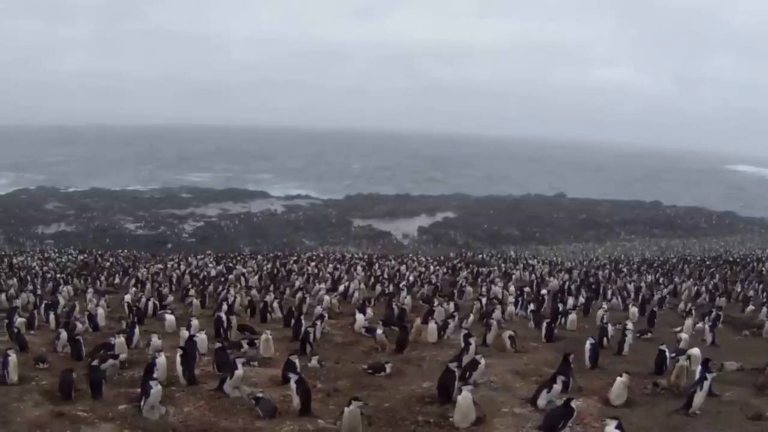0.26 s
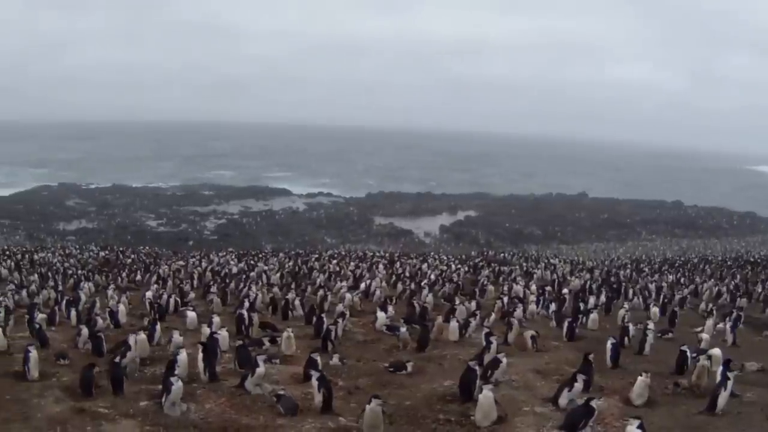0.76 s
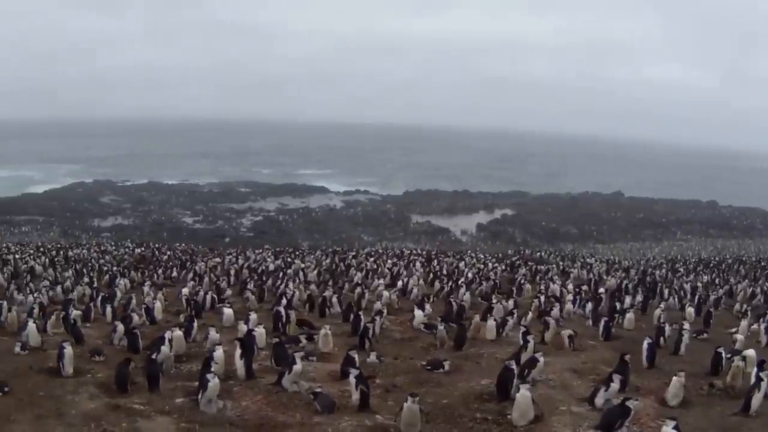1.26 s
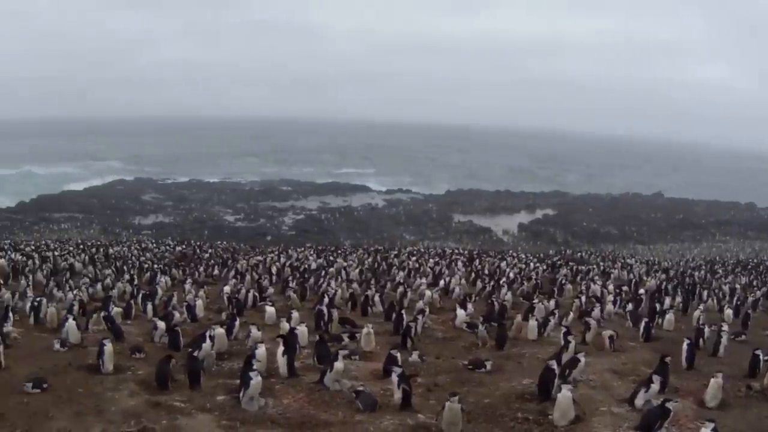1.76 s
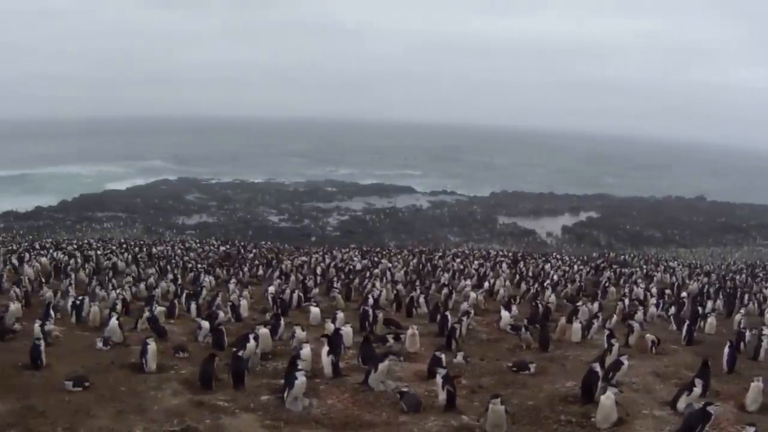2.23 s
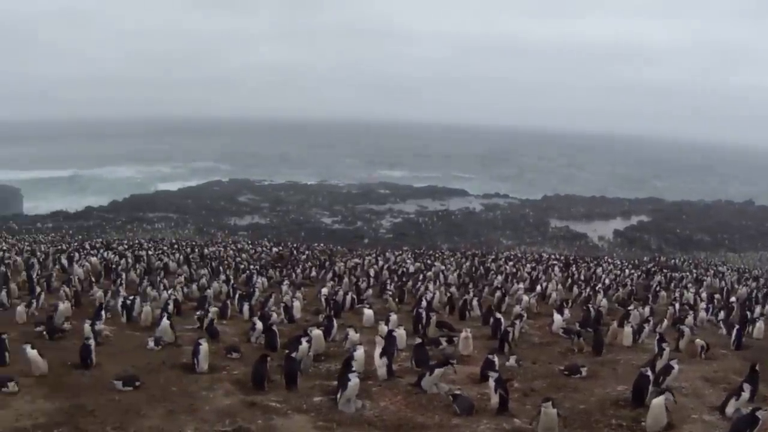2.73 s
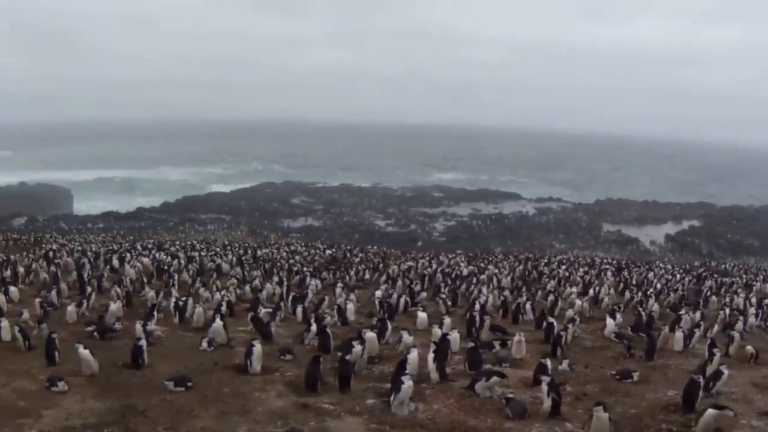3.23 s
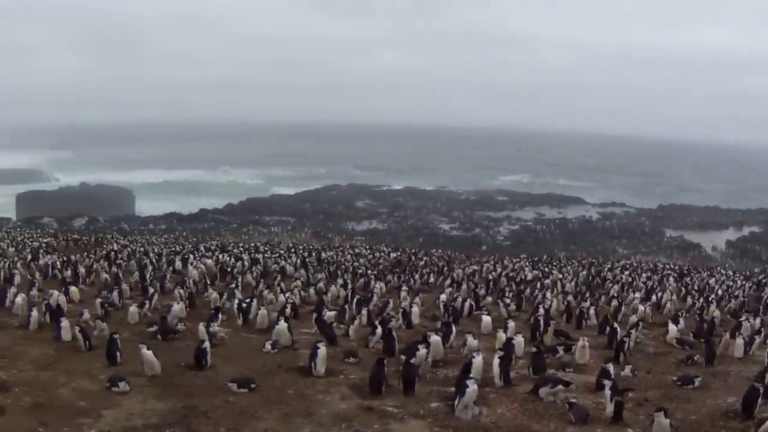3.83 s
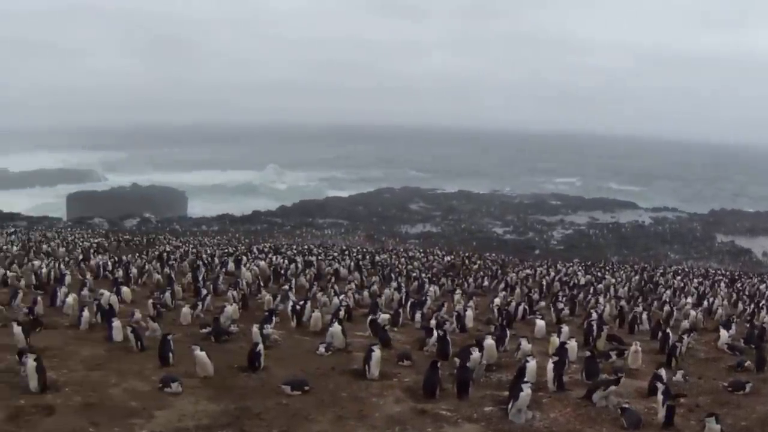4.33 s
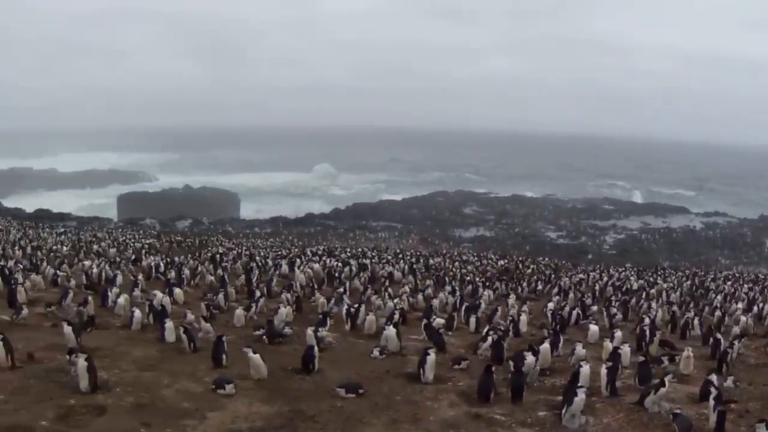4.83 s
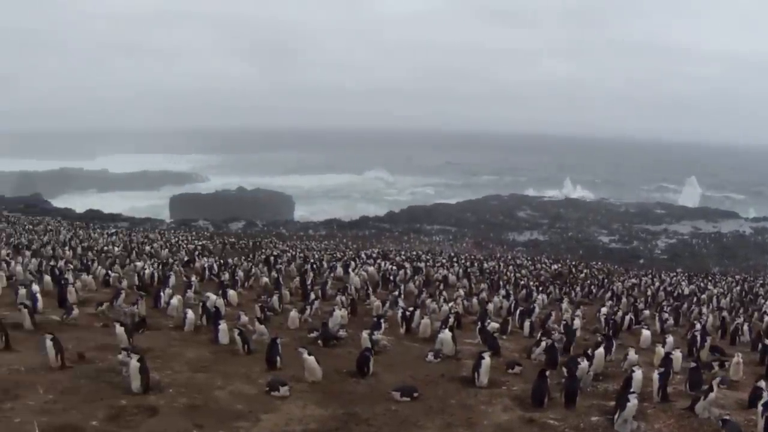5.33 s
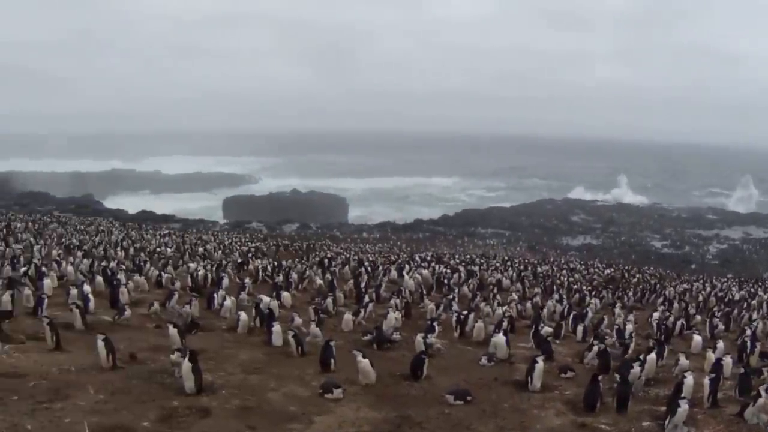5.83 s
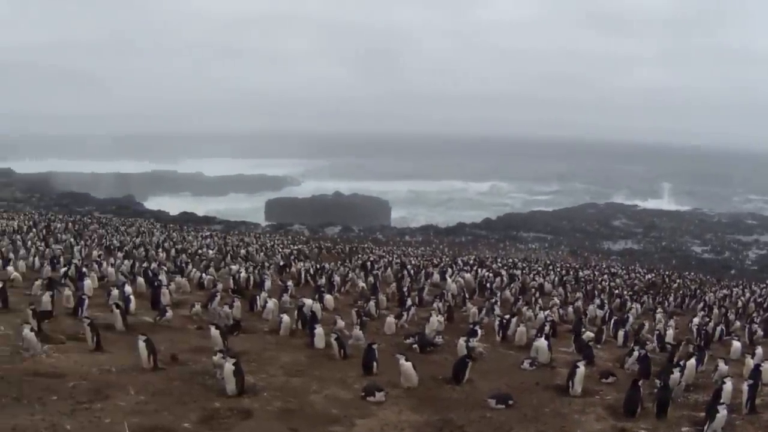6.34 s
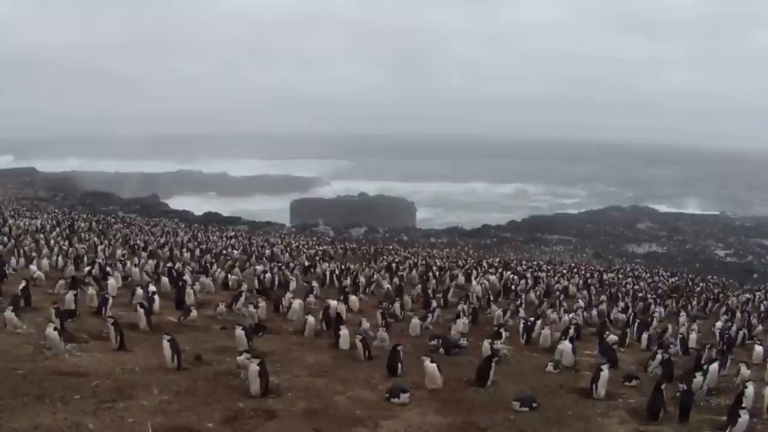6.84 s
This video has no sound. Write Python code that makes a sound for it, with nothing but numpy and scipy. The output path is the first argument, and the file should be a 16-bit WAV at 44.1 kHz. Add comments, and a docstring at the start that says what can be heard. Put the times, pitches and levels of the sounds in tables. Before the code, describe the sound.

Sharp chick peeps crowd the first four seconds, then short raspy adult penguin brays stand out above a dense distant colony and soft surf.

```python
"""Penguin colony on a windy shore.

Near chicks whistle arched peeps: bent sine glides with weak overtones. Adults bray: uneven voice pulses and
breath pass through throat resonances. Hundreds of far pulse-train calls blend over noise-band surf. A plastic
case around the small camera that hears them colours the sound; wind rumbles on it, a few soft low bumps sound
early on, and the recorder adds grit that follows the loudness."""
import sys
import numpy as np
from scipy import signal
from scipy.fft import rfft, irfft
from scipy.io import wavfile
from scipy.ndimage import uniform_filter1d

SR = 44100
rng = np.random.default_rng(int(sys.argv[2]) if len(sys.argv) > 2 else 0)


def store_pcm(level_fs):
    """Save levels as 16-bit WAV."""
    pcm = np.round(np.clip(level_fs, -1, 1) * 32767).astype(np.int16)
    wavfile.write(sys.argv[1], SR, np.atleast_2d(pcm).T)


N = 312730

# resonances of the plastic case, heard on brays and colony: (frequency [Hz], relative gain [dB])
CASE_RESONANCES = [(150, -77), (250, -40), (364, -54), (615, -30.5), (830, -16.5), (978, -3), (1490, -5),
                   (1650, -3), (2230, -16), (2520, -26), (2840, -29.5), (3350, -29.5), (3890, -35.5),
                   (5330, -18.5), (9000, -53), (11700, -71), (19800, -120)]
PEEP_ATTACK_S = 0.004


def undb(db):
    """Amplitude is the exponential of level: 20 dB is a factor of ten."""
    return 10 ** (np.asarray(db) / 20)


def level(x, db):
    """Normalises the root-mean-square amplitude to a level in dB."""
    return x * undb(db) / np.sqrt(np.mean(x ** 2))


def colour(x, table):
    """Spectral filtering: gain follows (Hz, dB) points, interpolated over log frequency."""
    hz, db = np.transpose(table)
    bins = np.maximum(np.arange(len(x) // 2 + 1) * SR / len(x), 1)
    gain_db = np.interp(np.log(bins), np.log(hz), db)
    return irfft(rfft(x) * undb(gain_db), len(x))


def ring(x, hz, width_hz):
    """Two-pole resonance with gain 1 at its centre."""
    return signal.lfilter(*signal.iirpeak(hz, hz / width_hz, fs=SR), x)


def walk(rate):
    """Slow random modulation: values held 1 / rate s, smoothed twice, rms 1."""
    k = int(SR / rate)
    held = np.repeat(rng.standard_normal(N // k + 1), k)
    smooth = uniform_filter1d(uniform_filter1d(held, k), k)
    return level(smooth[:N], 0)


def unsteadiness(length, step):
    """Band-limited random fluctuation with one independent value per step samples."""
    return signal.resample(rng.standard_normal(length // step + 2), length)


def highpass(x, hz):
    """Zero-phase high-pass: removes the lows without delaying the rest."""
    return signal.sosfiltfilt(signal.butter(4, hz, "high", fs=SR, output="sos"), x)


def add(out, x, s):
    """Superposition: sums x into out from time s."""
    i = max(int(s * SR), 0)
    out[i:i + len(x)] += x[:max(len(out) - i, 0)]


def far_calls(count, spread_db, wobble):
    """Superposed harmonic pulse trains with random arched pitch, low for adults and high for chicks."""
    out = np.zeros(N)
    for at, size, long, pitch, bend, slope in rng.random((count, 6)):
        u = np.linspace(0, 1, int((0.03 + 0.07 * long) * SR))  # progress through the call
        low = pitch < 0.65
        base_hz = 160 + 400 * pitch if low else 2100 * pitch
        hz = base_hz * (1 + 0.2 * bend * np.sin(np.pi * u) + 0.4 * (slope - 0.7) * u)
        shake = unsteadiness(len(u), 150)
        phase = np.cumsum(hz * (1 + wobble * (1 + low) * shake)) / SR
        # only harmonics between about 600 and 7500 Hz
        order = np.arange(max(int(600 / hz.mean()), 1), int(7500 / hz.max()) + 1)
        partials = np.cos(2 * np.pi * phase[:, None].astype(np.float32) * order.astype(np.float32))
        voice = partials.sum(1) / np.sqrt(len(order))
        loudness = undb(spread_db * np.log(size + 0.035))
        add(out, voice * np.sin(np.pi * u) * loudness, at * (N / SR + 0.1) - 0.1)
    return level(out, 0)


def colony():
    """Resonant filtering of blended calls and noise; body and shrill band are modulated separately."""
    # swelling of the far colony and surf: (time [s], body gain [dB], shrill and surf gain [dB])
    crowd_gains = [(0.0, -46.5, -54.5), (0.26, -40.5, -51.5), (0.49, -34.5, -44.5), (1.03, -33, -45.5),
                   (1.24, -34, -43.5), (2.03, -31.5, -44), (2.92, -32.5, -42), (3.14, -33, -42),
                   (3.43, -32, -41), (5.35, -35, -47), (7.09, -35.5, -50)]
    s, body_db, shrill_db = np.transpose(crowd_gains)
    t = np.arange(N) / SR
    voices = far_calls(count=800, spread_db=2.2, wobble=0.018)
    blend = colour(voices + level(rng.standard_normal(N), -4), CASE_RESONANCES)
    shrill = highpass(blend, 3900)
    surf = highpass(colour(rng.standard_normal(N), CASE_RESONANCES), 2400)
    body_swell = undb(np.interp(t, s, body_db) + 0.8 * walk(7))
    body = level(blend - shrill, 1.5) * body_swell
    shrill_swell = undb(np.interp(t, s, shrill_db) + 2.0 * walk(8.8))
    return body + (level(shrill, -4.5) + level(surf, -7)) * shrill_swell


def wind():
    """Turbulence as gusting low noise on the case, plus a few soft bumps as noise bursts exciting a resonance."""
    # rumble spectrum: (frequency [Hz], relative gain [dB])
    rumble_spectrum = [(15, 8.5), (30, -4), (70, -9), (200, -15), (450, -12.5), (600, -3.5), (900, -90)]
    # soft low bumps: (time [s], level before the shared gain [dB], ring frequency [Hz])
    bumps = [(.47, -51, 780), (.54, -64.5, 710), (0.589, -82, 248), (.62, -65.5, 775)]
    # shared gain of rumble and bumps, uneven at the start: (time [s], gain [dB])
    opening_gain = [(0, -4), (.25, 8), (.45, 2), (.55, 15.5)]
    gusts = undb(1.5 * walk(25))
    out = level(colour(rng.standard_normal(N) * gusts, rumble_spectrum), -77.5)
    t = np.arange(4000) / SR
    for s, db, hz in bumps:
        burst = rng.standard_normal(len(t)) * np.exp(-t / 0.025) * np.clip(t / 0.006, 0, 1)
        add(out, level(ring(ring(burst, hz, 170), hz, 180), db), s)
    return out * undb(np.interp(np.arange(N) / SR, *np.transpose(opening_gain)))


def whistle(hz, second_db, third_db):
    """Additive synthesis: an unsteady sine of rms 1 plus weak overtones of fluctuating level."""
    # base levels of partials 2, 3 and 4: (level [dB])
    overtones_db = [-19, -18, -31.5]
    # first partial's resonance, by which overtones are lowered: (centre [Hz], width [Hz], height [dB])
    first_partial_peak = 1665, 200, 5.3
    # what the case passes of the overtones: (frequency [Hz], gain [dB])
    overtone_pass = [(2600, -12), (3450, 3), (4000, -16), (4800, 6), (5500, 5), (7200, 0.5), (8000, 1)]
    peak_hz, width_hz, peak_db = first_partial_peak
    unsteady_hz = hz * (1 + 0.0038 * unsteadiness(len(hz), 200))
    phase = 2 * np.pi * np.cumsum(unsteady_hz) / SR
    lift_db = peak_db / (1 + ((hz - peak_hz) / width_hz) ** 2)
    out = np.sin(phase)
    for k, base_db in enumerate(overtones_db, 2):
        patchy_db = 3.27 * unsteadiness(len(hz), 250)
        pass_db = np.interp(k * hz, *np.transpose(overtone_pass))
        partial_db = base_db - lift_db + pass_db + patchy_db + second_db * (k == 2) + third_db * (k == 3)
        out = out + undb(partial_db) * np.sin(k * phase)
    return np.sqrt(2) * out


def peep(s, length, first_hz, middle_hz, last_hz, db, swell_db, beat):
    """Frequency glide with a pointed bend; resonance lifts it near one pitch and beating roughens it."""
    # resonance of loudness with pitch: (centre [Hz], width [Hz], height [dB])
    loudest_pitch = 1624, 137, 9.9
    # gain of the third partial by start of the call: (time [s], gain [dB])
    third_partial_gain = [(.5, -14), (2, -11.5), (3.2, -2.5), (3.6, -0.5), (3.9, 0), (4.05, 13), (4.2, -7),
                          (4.29, 11), (4.34, -5), (4.7, 0)]
    release_s, beat_hz, beat_end_s = 0.016, 121, 0.055
    pointed = 1.8  # 1 is a round arch; more gives a narrow top with flat skirts
    second_fade_db_per_s = 2.5  # the second partial of later peeps is weaker
    age = np.arange(0, PEEP_ATTACK_S + length + release_s / 2, 1 / SR)
    u = np.clip((age - PEEP_ATTACK_S) / length, 0, 1)
    glide_hz = first_hz + (last_hz - first_hz) * u
    bend_hz = (middle_hz - (first_hz + last_hz) / 2) * np.abs(np.sin(np.pi * u)) ** pointed
    hz = glide_hz + bend_hz
    peak_hz, width_hz, peak_db = loudest_pitch
    loudness_db = db + swell_db * (u - 0.5) + peak_db / (1 + ((hz - peak_hz) / width_hz) ** 2)
    ends = np.clip(np.minimum(age / PEEP_ATTACK_S, (age[-1] - age) / release_s), 0, 1)
    # beating grows after the onset and has gone by beat_end_s
    depth = beat * np.clip(np.minimum(age / 0.016, (beat_end_s - age) / 0.01), 0, 1)
    beating = 1 + depth * np.cos(2 * np.pi * beat_hz * (age - 0.01))
    third_db = np.interp(s, *np.transpose(third_partial_gain))
    voice = whistle(hz, -second_fade_db_per_s * s, third_db)
    return voice * undb(loudness_db) * ends * beating


def chicks():
    """Superposed near peeps; resonant air noise follows their smoothed energy as a wheeze outlasting them."""
    # near peeps, pitch bending smoothly through three notes:
    # (time [s], length [s], first pitch [Hz], middle pitch [Hz], last pitch [Hz],
    #  base level [dB], swell from start to end [dB], depth of hoarse beating [0-1])
    peep_calls = [ (0.047, 0.036, 2000, 1810, 1730, -43, 0, 0), (0.37, 0.032, 2020, 1940, 1920, -42, -4, 0),
                  (0.533, 0.032, 1350, 1410, 1510, -35, -4, 0),
                  (0.562, 0.086, 1600, 1735, 1573, -40, 11, 0),
                  (0.801, 0.12, 1574, 1730, 1585, -35, 6, 0.08),
                  (0.951, 0.031, 1930, 1864, 1850, -39, -10, 0.06),
                  (1.029, 0.049, 1304, 1330, 1420, -31, 5, 0), (1.05, .083, 1095, 1040, 990, -40.5, 5, 0),
                  (1.085, 0.094, 1637, 1830, 1594, -32.5, 7, 0),
                  (1.195, 0.04, 1110, 1002, 1015, -39, 4, 0.1), (1.204, .08, 2033, 1650, 1250, -41, -4, 0),
                  (1.423, 0.034, 1676, 1645, 1610, -32, -5, 0.5),
                  (1.463, 0.056, 2030, 1840, 1790, -31.5, 3, 0),
                  (1.681, 0.042, 1732, 1680, 1637, -28, -6, 0.53),
                  (1.735, 0.0475, 2050, 1890, 1770, -30, 3, 0),
                  (1.869, 0.033, 1356, 1407, 1510, -28.5, 4, 0.08),
                  (1.908, 0.057, 1616, 1730, 1780, -30.5, 0.5, 0),
                  (1.954, 0.06, 1675, 1650, 1585, -30.5, -2, 0.34),
                  (2, .035, 1990, 1870, 1816, -34, 0.5, 0.08), (2.121, 0.041, 1325, 1340, 1410, -34, -6, 0),
                  (2.165, 0.12, 1602, 1820, 1595, -30.5, 6, 0),
                  (2.204, 0.029, 1120, 1080, 1053, -34.5, -10.5, 0),
                  (2.299, 0.023, 1103, 1043, 1077, -38, -2, 0.1),
                  (2.365, 0.072, 2063, 2090, 2200, -38.5, 0, 0),
                  (2.359, 0.039, 1335, 1293, 1272, -35.5, -8, 0),
                  (2.413, 0.041, 1330, 1357, 1430, -27.5, 9, 0), (2.462, .046, 1622, 1728, 1760, -31, 0, 0),
                  (2.488, .077, 1825, 1769, 1580, -29.5, 3, 0.08),
                  (2.576, .03, 2295, 2110, 1930, -38.5, 2, 0),
                  (2.684, 0.069, 1312, 1375, 1503, -30.5, 5, 0),
                  (2.69, 0.041, 1732, 1647, 1633, -31.5, -5, 0.46),
                  (2.749, 0.048, 1690, 1764, 1765, -35, -5, 0.1),
                  (2.73, 0.0288, 2080, 1956, 1850, -33, 6, 0.1),
                  (2.827, .031, 1760, 1630, 1610, -29.5, -1, 0),
                  (2.873, .03, 2037, 2115, 2260, -35.5, -5, 0),
                  (2.956, 0.037, 1702, 1638, 1667, -30.5, -5, 0.65),
                  (2.989, 0.034, 1093, 1023, 914, -39, -15.5, 0),
                  (3.001, .055, 2039, 1805, 1710, -35, -6, 0),
                  (3.232, 0.033, 1744, 1650, 1585, -31, -2, 0.2),
                  (3.269, 0.021, 990, 984, 970, -36, -6, 0.06),
                  (3.321, 0.085, 2255, 2280, 2320, -40, -1.5, 0.04),
                  (3.325, 0.07, 1664, 1633, 1675, -34, -1, 0.36),
                  (3.41, 0.073, 1716, 1830, 1645, -40, -14, 0),
                  (3.525, 0.046, 1310, 1360, 1450, -31, 9, 0.1),
                  (3.575, .095, 1645, 1863, 1580, -30.5, 10, 0.06),
                  (3.722, 0.053, 2058, 1890, 1750, -36.5, -5, 0.08),
                  (3.854, 0.033, 1377, 1393, 1520, -29, 1, 0.08),
                  (3.89, 0.025, 1596, 1750, 1780, -32.5, 0, 0.1),
                  (3.925, 0.063, 1803, 1750, 1536, -34, 10, 0.1),
                  (4.011, 0.038, 952, 913, 900, -38.5, 1, 0), (4.044, 0.11, 1623, 1750, 1560, -53, -13, 0),
                  (4.292, .07, 1684, 1720, 1670, -45.5, -11, 0),
                  (4.185, 0.046, 994, 987, 1003, -35.5, 0, 0), (4.215, 0.042, 1630, 1455, 1340, -34, 10, 0),
                  (4.326, 0.058, 999, 954, 1020, -33.5, 1, 0.1),
                  (4.341, 0.034, 1692, 1616, 1576, -35, 4, 0), (4.39, 0.051, 1947, 1737, 1600, -37.5, 1, 0),
                  (4.451, .052, 1596, 1609, 1560, -31.5, 2, 0.1),
                  (4.513, 0.022, 2083, 1840, 1780, -45, -10, 0),
                  (5.384, 0.032, 1512, 1530, 1600, -39.5, -12, 0.08),
                  (6.086, .028, 1796, 1830, 1730, -38, -9, 0), ]
    wheeze_hz, wheeze_db, wheeze_s = 10150, -39.5, 0.0293  # level is relative to the peeps' envelope
    out = np.zeros(N)
    for row in peep_calls:
        add(out, peep(*row), row[0] - PEEP_ATTACK_S)
    hold = np.exp(-1 / (wheeze_s * SR))
    effort = np.sqrt(signal.lfilter([1 - hold], [1, -hold], out ** 2))
    air = ring(ring(rng.standard_normal(N), wheeze_hz, 640), wheeze_hz, 810)
    fading = np.clip((3.6 - np.arange(N) / SR) / 0.37, 0, 1)  # the wheeze dies out partway
    ragged = undb(2 * walk(15))
    return out + level(air, wheeze_db) * effort * fading * ragged


def bray(length, throat_hz, jitter=0.06, breath=1.8, sag=0.2):
    """Source and filter: slowing, uneven pulses with puffs of breath excite throat and case resonances."""
    pulse_hz = 239  # nominal rate, about which the slowing is centred
    t = np.arange(int(length * SR)) / SR
    timing, strength = rng.standard_normal((60, 2)).T
    slowing = 1 + sag * (np.arange(60) / (pulse_hz * length) - 0.5)  # stretches the intervals
    at = (np.cumsum(slowing + jitter * timing) * SR / pulse_hz).astype(int)
    inside = at < len(t)
    pulses = np.zeros(len(t))
    pulses[at[inside]] = undb(2 * strength)[inside]
    puffs = signal.lfilter([1], [1, -0.992], pulses) * rng.standard_normal(len(t))
    source = level(pulses, 0) + breath * level(puffs, 0)
    voice = source + undb(17.5) * ring(source, throat_hz, 440)
    # the second resonance, at twice the throat frequency, is fed by the source in parallel with the first
    second = ring(source, 2 * throat_hz, 510)
    voice = voice + undb(17) * second
    return level(colour(voice, CASE_RESONANCES), 0) * np.sin(np.pi * (t / length) ** 0.73)


def adults():
    """Superposition of the nearest bray syllables."""
    # bray syllables: (time [s], level before the swell and fade [dB], length [s], throat resonance [Hz])
    bray_syllables = [(0.263, -35.5, 0.093, 1900), (0.33, -38, 0.12, 1860), (0.653, -35.5, 0.17, 1735),
                      (0.751, -32.5, 0.088, 1590), (1.183, -34, 0.094, 1710), (1.5943, -30, 0.11, 1750),
                      (2.011, -31.5, 0.052, 1660), (2.6, -39, 0.077, 1751), (3.009, -34, 0.069, 1675),
                      (3.266, -26, 0.063, 1750), (3.656, -26, 0.078, 1980), (3.982, -25, 0.0565, 1930),
                      (4.165, -32, 0.063, 1730), (4.2543, -28.5, 0.074, 1800), (4.4914, -25.5, 0.065, 1820),
                      (4.633, -33, 0.13, 1610), (4.764, -28, 0.092, 1630), (4.836, -28.5, 0.085, 1760),
                      (5.0813, -28, 0.084, 1770), (5.147, -36, 0.083, 1750), (5.3518, -27.5, 0.087, 1750),
                      (5.4242, -25, 0.069, 1800), (5.6155, -35, 0.081, 1600), (5.671, -31, 0.077, 1720),
                      (5.9603, -28.5, 0.089, 1730), (6.0283, -28.5, 0.088, 1770),
                      (6.2177, -33.5, 0.092, 1580), (6.2854, -29, 0.068, 1670), (6.572, -29, 0.058, 1710),
                      (6.65, -27.5, 0.062, 1810), (6.9136, -29.5, 0.093, 1720)]
    out = np.zeros(N)
    for s, db, length, throat_hz in bray_syllables:
        add(out, undb(db) * bray(length, throat_hz), s)
    return out


def scatter(near):
    """Diffuse scattering off rocks and bodies: convolution with a short decaying noise."""
    smear = rng.standard_normal(4000) * np.exp(-np.arange(4000) / SR / 0.05)
    smear = smear / np.sqrt(np.sum(smear ** 2))
    return undb(-13) * signal.fftconvolve(near, smear)[:N]


def scene():
    """Superposition of near calls, their scattering, the far colony and the wind."""
    near = chicks() + adults()
    return (near + scatter(near) + colony() + wind())[None]


def record(dry):
    """Signal-dependent noise: grit follows the loudness over a steady hiss; a low-pass cuts the top."""
    loud = np.sqrt(np.maximum(uniform_filter1d(dry ** 2, size=200), 0))
    # (frequency [Hz], gain [dB])
    grit_spectrum = [(300, -4.0), (8000, 4.0), (10200, 2.0), (11200, 4), (16000, 2.5)]
    grit = (undb(-36) * loud + undb(-84)) * colour(rng.standard_normal(N), grit_spectrum)
    top_cut = signal.ellip(14, 0.5, 60, 15720, fs=SR, output="sos")  # cutoff in Hz
    return signal.sosfilt(top_cut, dry + grit)


dry = scene()
out = record(dry)
store_pcm(out)
```